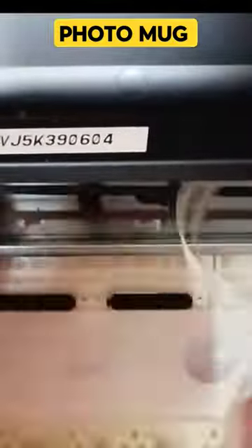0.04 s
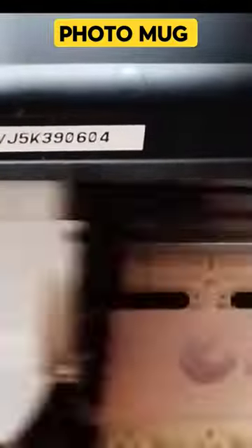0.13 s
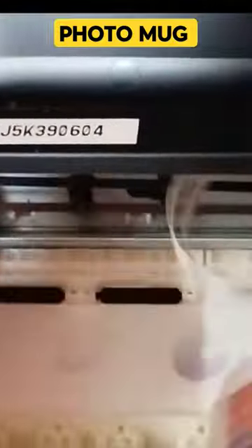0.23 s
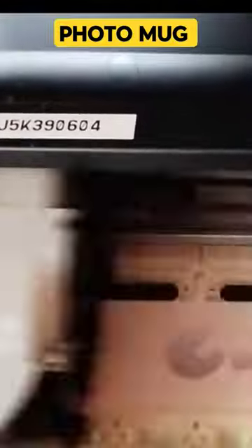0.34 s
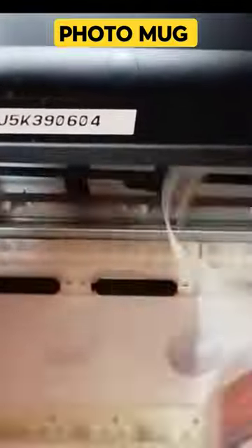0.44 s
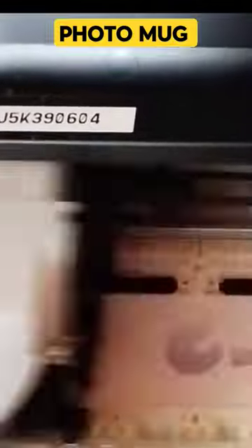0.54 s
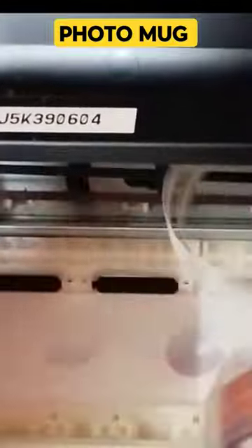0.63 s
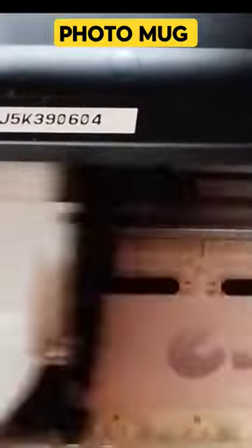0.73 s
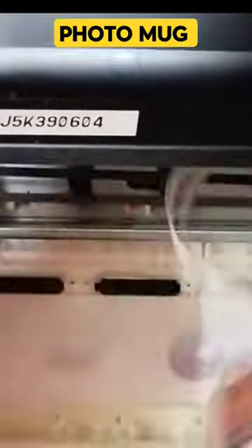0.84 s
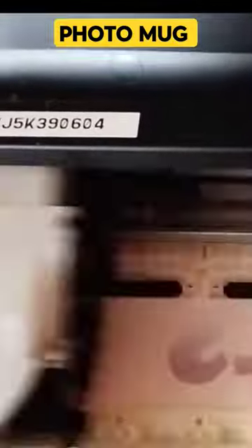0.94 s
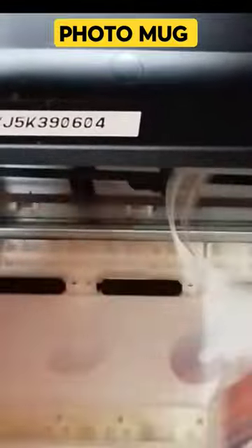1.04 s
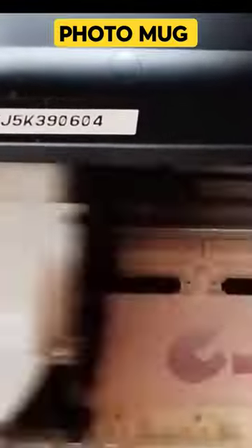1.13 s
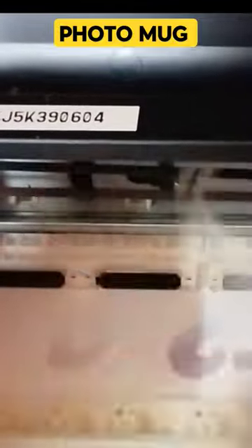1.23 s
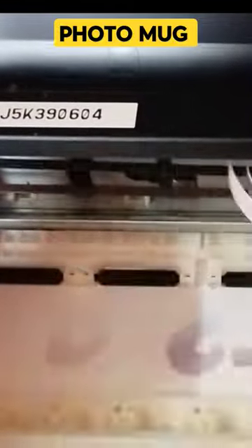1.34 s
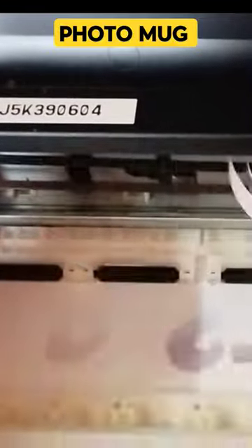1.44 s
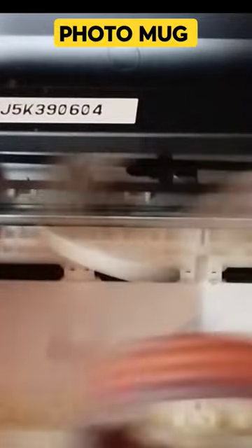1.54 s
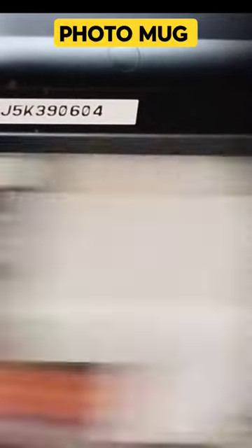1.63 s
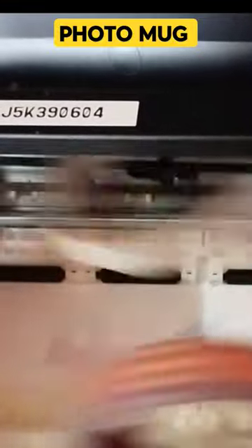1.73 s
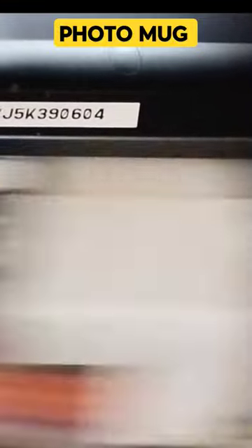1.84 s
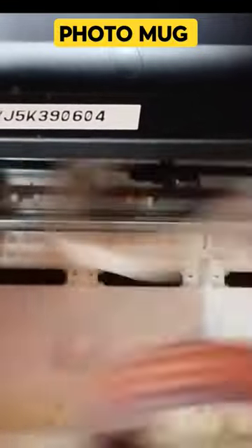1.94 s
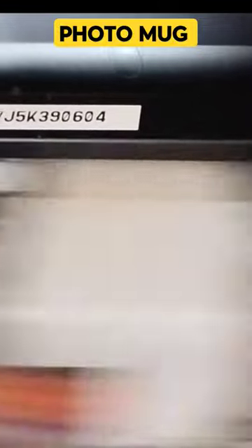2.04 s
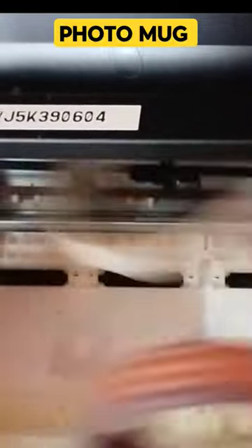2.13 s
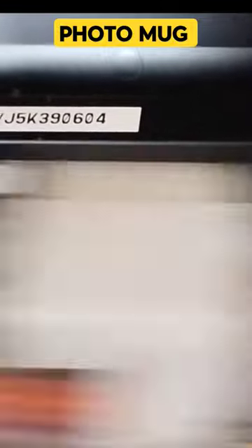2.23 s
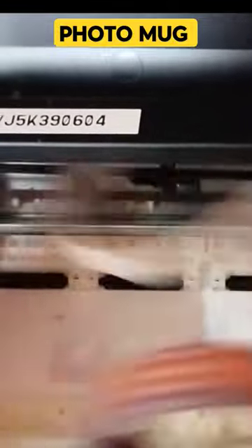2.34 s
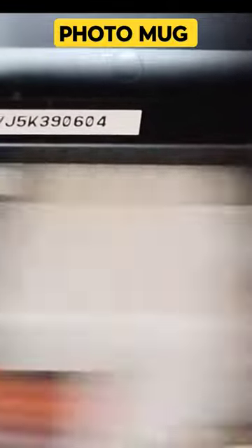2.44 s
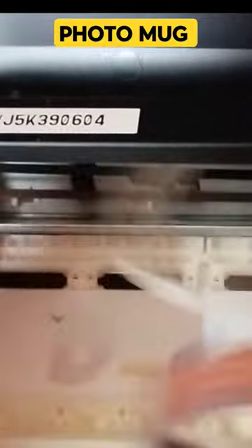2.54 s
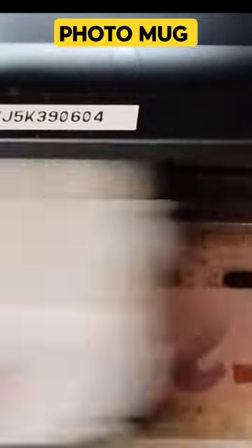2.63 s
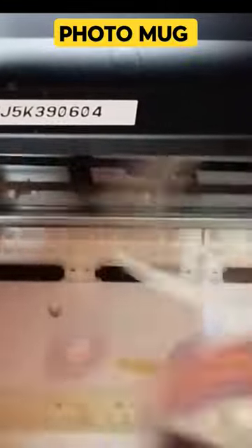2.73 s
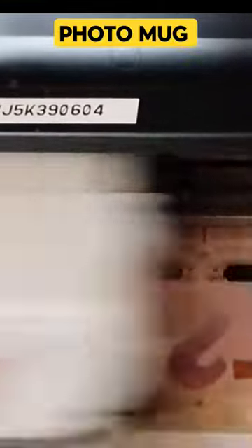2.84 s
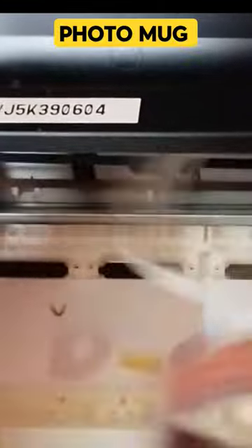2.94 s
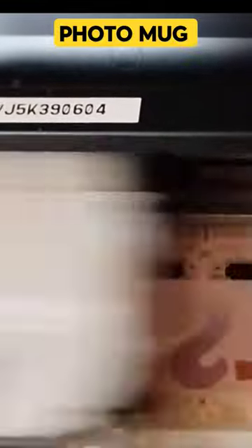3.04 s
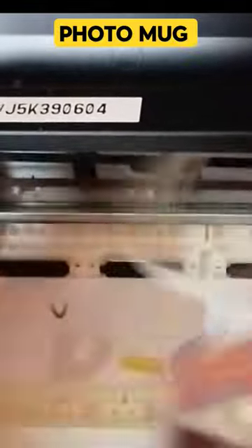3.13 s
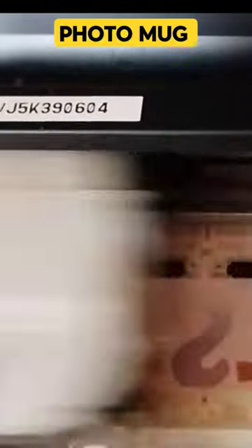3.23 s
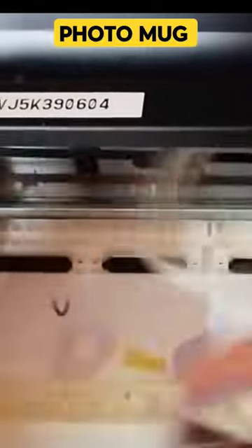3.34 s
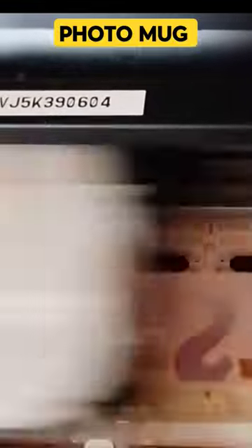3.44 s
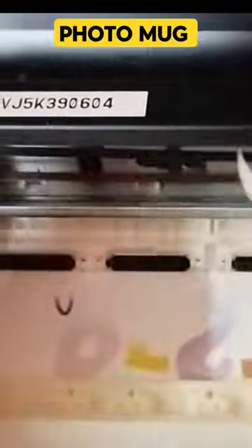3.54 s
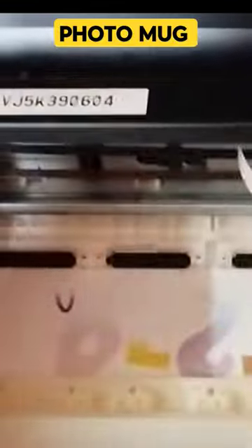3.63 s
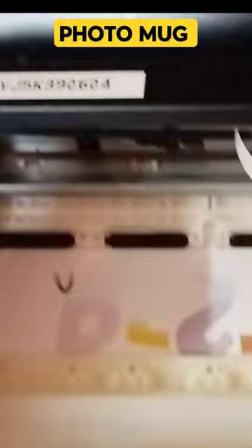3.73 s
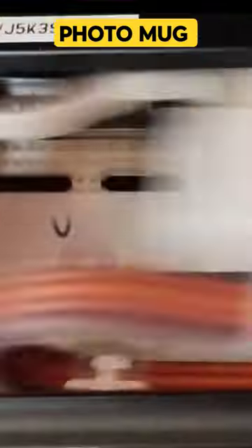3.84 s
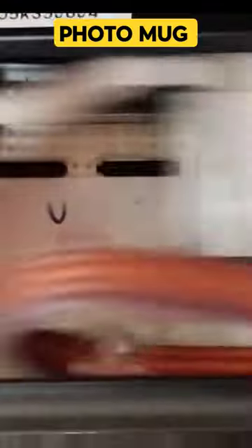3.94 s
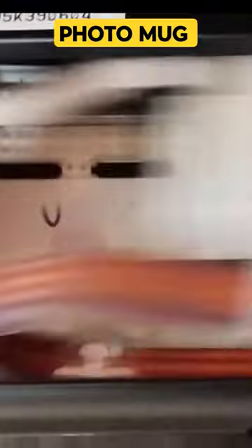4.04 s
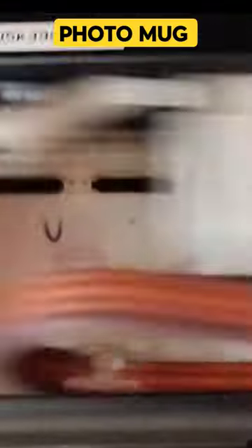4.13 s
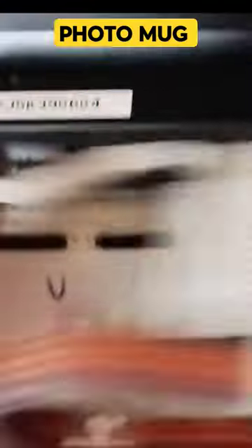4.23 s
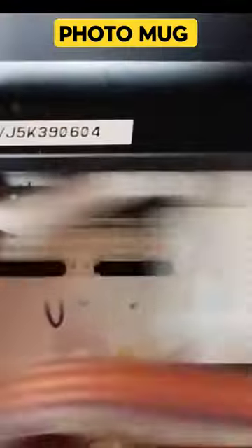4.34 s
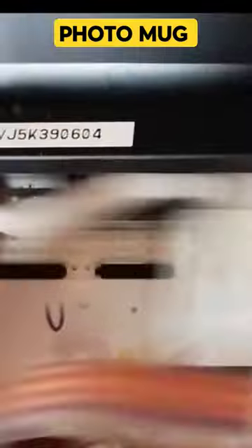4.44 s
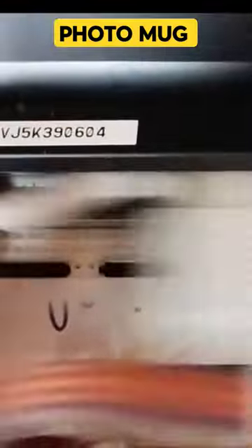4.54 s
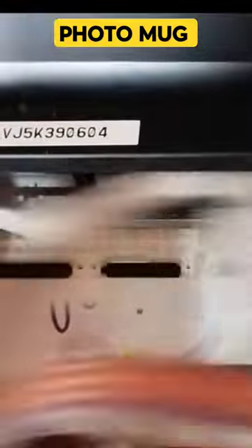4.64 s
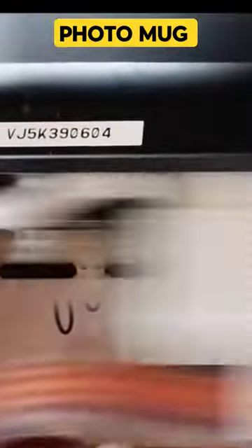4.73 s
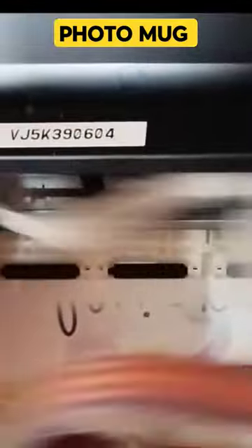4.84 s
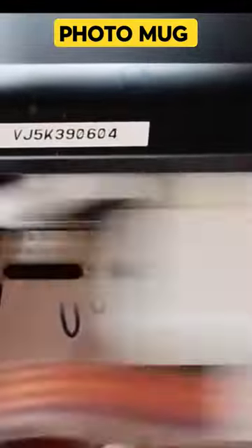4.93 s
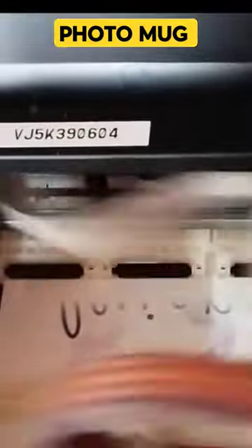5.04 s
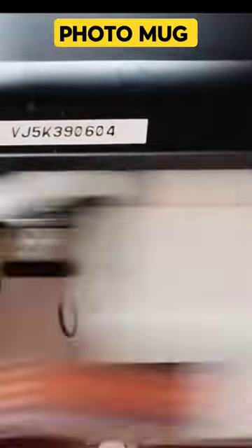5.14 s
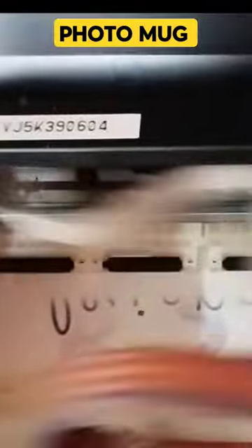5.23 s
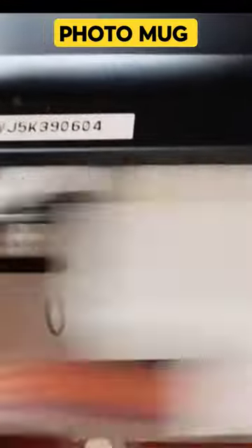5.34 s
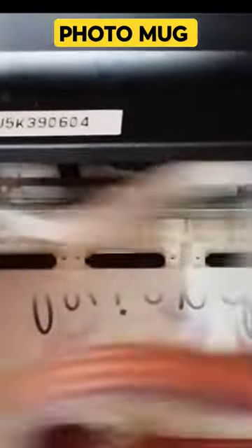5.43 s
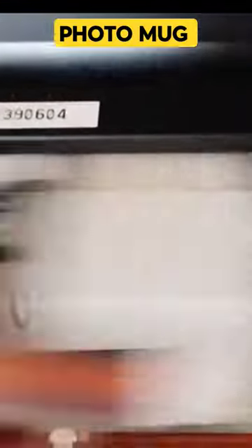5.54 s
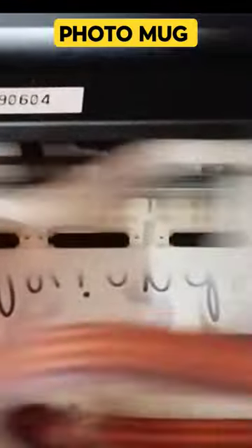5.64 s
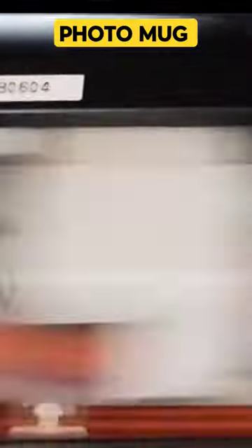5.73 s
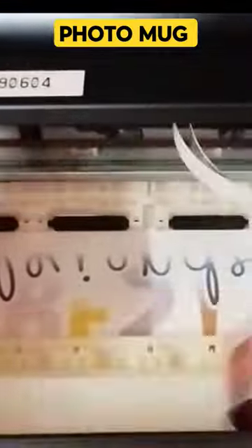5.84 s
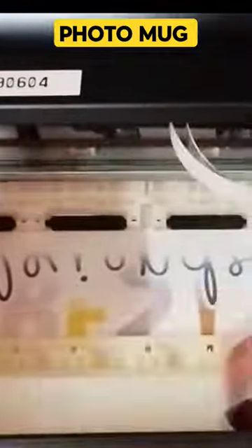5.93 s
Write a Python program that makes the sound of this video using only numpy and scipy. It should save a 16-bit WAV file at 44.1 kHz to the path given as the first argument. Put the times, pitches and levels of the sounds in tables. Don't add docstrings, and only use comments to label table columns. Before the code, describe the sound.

Close-up inkjet printer mechanism: three fast chattering passes of belt whine, squeaky plastic and dry hiss, separated by short quiet gaps.

```python
import sys
import numpy as np
from scipy import signal
from scipy.fft import rfft, irfft, next_fast_len
from scipy.io import wavfile
from scipy.ndimage import uniform_filter1d

SR = 44100
rng = np.random.default_rng(int(sys.argv[2]) if len(sys.argv) > 2 else 0)


def bounce(signal):
    frames = np.transpose(np.atleast_2d(signal))
    limited = np.clip(frames, -1, 1)
    pcm = np.round(limited * 32767).astype(np.int16)
    wavfile.write(sys.argv[1], SR, pcm)


def rack_gain(trim_db):
    fader = np.asarray(trim_db, float)
    return 10 ** (fader / 20)


N = 264159
PADDED = next_fast_len(N)
TIME = np.arange(N) / SR
TURN_MS = 201


def unit_rms(x):
    return x / np.sqrt(np.mean(x ** 2) + 1e-20)


def at_hz(points, hz):
    table_hz, values = np.transpose(points)
    return np.interp(np.log(hz + 1), np.log(table_hz + 1), values)


def drift(rate_hz, size=N):
    r = np.exp(-8 * np.pi * rate_hz / SR)
    noise = rng.standard_normal(size // 4 + 6002)
    slow = signal.lfilter([1], [1, -2 * r, r * r], noise)[6000:]
    return np.interp(np.arange(size) / 4, np.arange(len(slow)), unit_rms(slow))


def resonate(x, hz, width_hz):
    r = np.exp(-np.pi * width_hz / SR)
    poles = [1, -2 * r * np.cos(2 * np.pi * hz / SR), r * r]
    return signal.lfilter([(1 - r * r) / 2, 0, (r * r - 1) / 2], poles, x)


def coloured(spectrum):
    hz = np.fft.rfftfreq(PADDED, 1 / SR)
    white = rfft(rng.standard_normal((2, PADDED)))
    return unit_rms(irfft(white * rack_gain(at_hz(spectrum, hz)), PADDED)[:, :N])


def cut(x, hz):
    return signal.sosfilt(signal.cheby2(14, 60, hz, fs=SR, output="sos"), x)


def turn_place(turns, middle_ms, half_ms):
    return ((turns - middle_ms / TURN_MS + .5) % 1 - .5) * TURN_MS / half_ms


def turn_dip(turns, depth_db, middle_ms, half_ms):
    return -depth_db * np.exp(-turn_place(turns, middle_ms, half_ms) ** 2)


def turn_swing(turns, peak_ms):
    return np.cos(np.pi * turn_place(turns, peak_ms, TURN_MS / 2))


def frame(modes, shake):
    out = 0
    for hz, width, db in modes:
        out = out + rack_gain(db) * unit_rms(resonate(resonate(shake, hz, 2 * width), hz, width))
    return out


def squeaks(rows, levels_db, turns):
    out = np.zeros((2, N))
    for (middle_ms, half_ms, from_hz, to_hz, rough_hz), db in zip(rows, levels_db):
        place = turn_place(turns, middle_ms, half_ms)
        now = abs(place) < 1.5
        place = place[now]
        phase = 2 * np.pi * np.cumsum(from_hz + (to_hz - from_hz) * (place + 1) / 2) / SR
        level = rack_gain(db + 1.6 * drift(5.4, len(place))) * np.exp(-place ** 4)
        a, b = drift(rough_hz, len(place)), drift(rough_hz, len(place))
        steady = np.clip(70 / rough_hz, 0, 2.5)
        level = level / np.sqrt(2 + steady ** 2)
        out[0, now] += level * ((steady + a) * np.sin(phase) + b * np.cos(phase))
        out[1, now] += level * (b[::-1] * np.sin(phase) + (steady + a[::-1]) * np.cos(phase))
    return out


def ring_modes(x, modes):
    return sum(rack_gain(db) * resonate(x, hz, width) * (-1) ** k for k, (hz, width, db) in enumerate(modes))


def bursts(times, levels_db, bounces, modes, rise_s):
    envelope = np.zeros(N)
    chance = rng.standard_normal((len(times), len(bounces)))
    for s, db, luck in zip(times, levels_db, chance):
        for (delay, rel_db, decay), lot in zip(bounces, luck):
            i = int((s + delay) * SR)
            t = np.arange(min(1500, N - i)) / SR
            level = rack_gain(db + rel_db + 2.5 * lot * (delay > 0))
            envelope[i:i + len(t)] += level * (1 - np.exp(-t / rise_s)) * np.exp(-(t / decay) ** 1.43)
    white = rng.standard_normal((2, N))
    return ring_modes(white * envelope + 1e-18, modes) / np.std(ring_modes(white[0, :20000], modes))


# start t/s, stop t/s, start of a pulley turn t/s, turn length t/s
PASSES = [
    (-.1, 1.503, .1586, .2005),
    (1.7195, 3.772, 1.8224, .2010),
    (3.9915, 6.1, 4.0965, .2018),
]


def pulley():
    brake_s, wake_s, wake_db = 0.029, 0.038, -21
    turns, on, braked = np.zeros((3, N))
    for start, stop, zero, length in PASSES:
        now = (TIME >= start - .1) & (TIME < stop + .12)
        turns[now] = (TIME[now] - zero) / length
        stir = rack_gain(wake_db) * np.clip(1 + (TIME - start) / wake_s, 0, 1) * (TIME < start)
        rise = np.clip((TIME - start) / 0.0084, 0, 1) + stir
        on += rise * np.exp(-np.clip(TIME - stop, 0, 1) / .0035)
        braked += np.clip(1 + (TIME - stop) / brake_s, 0, 1) * (TIME < stop + .1)
    return turns, on, braked


# t/s, motor effort level/dB, rail friction level/dB
DRIVE = [(0, 0.5, -0.5), (.75, 1.5, 3), (1.03, 3, 2), (1.2, -3.5, -1.5), (1.49, -3.5, -4), (1.73, -2.5, -2),
         (1.9, 1, 2.5), (2.4, 1, 0), (3.3, -1.5, 3.5), (3.55, -1.5, .5), (3.76, -2.5, -0.5),
         (4.0, -5, -2.5), (4.3, -0.5, -0.5), (4.7, -0.4, 0.5), (5.2, -0.3, -0.5), (5.45, 0.5, 1),
         (5.99, 0, 0.5)]


def motor_load():
    s, effort_db, friction_db = np.transpose(DRIVE)
    return np.interp(TIME, s, effort_db), np.interp(TIME, s, friction_db)


# middle t/ms, half length t/ms, loss level/dB, pitch slip f/Hz
FALTERS = [(14.73, 7.76, -8.5, 40), (38.15, 6, -7.5, -40), (120.2, 11.07, -1, 42), (143.5, 11.17, -10, 20),
           (187.8, 6.05, -3.5, -15)]
# t/s, direction
SLIP_LEAN = [
    (1.2, -1),
    (4.2, 1),
]


def whine(turns):
    tooth_hz, tooth_db, wobble = 489.5, -0.6, .005
    db, slip_hz = np.zeros((2, N))
    for middle_ms, half_ms, loss_db, slip in FALTERS:
        slack = np.exp(-turn_place(turns, middle_ms, half_ms) ** 4)
        db += loss_db * slack
        slip_hz += slip * slack
    lean = np.tanh(2 * np.interp(TIME, *np.transpose(SLIP_LEAN)) + 2.496 * drift(7.0))
    hz = (tooth_hz + slip_hz * lean) * (1 + wobble * drift(16.7))
    phase = 2 * np.pi * np.cumsum(hz) / SR
    return rack_gain(tooth_db + db + 1.3 * drift(43)) * np.sin(phase + [[0], [1]])


# f/Hz, width f/Hz, level/dB
LOW_FRAME = [(505, 69, -12.5), (317.5, 29.3, -17), (357, 33, -18.5), (245.5, 10.6, -24.5),
             (781, 200, -11.5), (944, 290, -20.5)]
# middle t/ms, half length t/ms, from f/Hz, to f/Hz, roughness f/Hz
LOW_SQUEAKS = [(83, 20, 800, 860, 12), (155, 8, 760, 800, 30), (138, 18, 380, 320, 20),
               (5, 12, 760, 780, 30), (125, 16, 790, 760, 60), (30, 14, 740, 800, 30),
               (30, 18, 310, 360, 20), (80, 22, 300, 370, 25), (185, 14, 340, 310, 25)]
LOW_SQUEAK_DB = [-7, -32.5, -6.5, -8.5, -5.5, -6.5, -10.5, -17, -22]


def belt_and_low_frame(turns, shake, effort_db):
    layers = frame(LOW_FRAME, shake) + whine(turns) + squeaks(LOW_SQUEAKS, LOW_SQUEAK_DB, turns)
    return rack_gain(-44 + effort_db) * layers


# f/Hz, width f/Hz, level/dB
MID_FRAME = [(1713, 82, -12), (1868, 16, -18.5), (1476, 165, -15), (2445, 175, -11.5), (2730, 140, -12),
             (3174, 250, -14), (3719, 37, -16.5), (4710, 380, -14.5), (6250, 50, -27.5)]
# middle t/ms, half length t/ms, from f/Hz, to f/Hz, roughness f/Hz
MID_SQUEAKS = [(68, 36, 2430, 2462, 10), (160, 30, 2330, 2460, 30), (64, 36, 1722, 1712, 60),
               (34, 12, 1860, 1885, 80), (94, 12, 1820, 1910, 80), (65, 22, 1895, 1885, 80),
               (195, 8, 1830, 1860, 40), (82, 14, 2690, 2760, 40), (88, 14, 3040, 3200, 60),
               (160, 9, 3230, 3260, 60), (38, 14, 4780, 4880, 90), (170, 26, 4850, 4960, 90),
               (146, 10, 7220, 7500, 260), (85, 8, 6850, 6950, 150), (165, 20, 12900, 13200, 1200)]
MID_SQUEAK_DB = [-4.5, -11.5, -3, -0.5, -1.5, -7.5, -4.5, -6, -5, -4.5, -8, -1.5, 1.5, -7, -3.5]


def mid_frame(turns, shake, effort_db, brake_db):
    level_db = -46 + 0.33 * effort_db + 1.5 * turn_swing(turns, peak_ms=73) + brake_db
    level_db = level_db + turn_dip(turns, 4.0, 9.6, 4.2)
    return rack_gain(level_db) * (frame(MID_FRAME, shake) + squeaks(MID_SQUEAKS, MID_SQUEAK_DB, turns))


# f/Hz, level/dB per Hz
RUSH = [(18, -64), (30, -30.5), (163, -33.5), (312, -22), (486, -9), (800, -26.5), (1310, -20),
        (1830, -19.5), (3170, -20), (6000, -19.5), (8500, -21.5), (11000, -22), (15100, -19.5)]


def rail_slide(turns, friction_db, brake_db):
    level_db = -50 + friction_db + 1.2 * turn_swing(turns, peak_ms=126) + brake_db
    slack_db = turn_dip(turns, 3.0, 6.5, 6)
    return rack_gain(level_db + 4.0 + slack_db + 2.0 * drift(127) + 1.8 * drift(10.5)) * coloured(RUSH)


def drive_noise(turns, braked, effort_db, friction_db):
    shake = rng.standard_normal((2, N)) * rack_gain(2.0 * drift(310) + 0.93 * drift(46))
    brake_db = -11 * braked
    return (belt_and_low_frame(turns, shake, effort_db) + mid_frame(turns, shake, effort_db, brake_db)
            + rail_slide(turns, friction_db, brake_db))


TICK_FIRST_S = [0.0568, 1.8200, 4.0942]
TICK_GAP_S = [.1001, .1005, .10097]
TICK_DB = [
    [-30, -17, -45, -24.5, -35.5, -38, -24, -22, -19.5, -22, -24, -37, -32, -36],
    [-24.5, -28, -25.5, -33, -39, -45, -29.5, -23, -30.5, -26, -28.5, -25.5, -25.5, -26, -24, -18, -18.5,
     -19, -30],
    [-28, -26, -29.5, -21, -21, -21, -26.5, -36, -28.5, -34, -18.5, -20.5, -18, -30.5, -26, -29, -26.5, -25,
     -26],
]
KNOCK_DB = [-35.5, -40.5]
KNOCK_PASS_DB = [1.5, -1.5, 0.7]
# t/s, tick level/dB, dull part level/dB, knock level/dB
JOLTS = [
    (1.491, -39.5, -46, -28),
    (1.718, -35.5, -33, -49),
    (3.7646, -34, -38, -34),
    (3.992, -29.5, -35.5, -58),
]


def tick_rows(effort_db):
    rows = []
    passes = zip(PASSES, TICK_FIRST_S, TICK_GAP_S, TICK_DB, KNOCK_PASS_DB)
    for (_, _, zero, _), first, gap, strengths, pass_db in passes:
        for k, db in enumerate(strengths):
            s = first + k * gap
            second = round((s - zero) / gap) % 2
            dull_db = -30.5 + 0.28 * (db + 24.5)
            knock_db = KNOCK_DB[second] + pass_db + effort_db[int(s * SR)]
            rows.append((s, db, dull_db, knock_db, second))
    return np.transpose(rows + [(*row, 0) for row in JOLTS])


# f/Hz, width f/Hz, level/dB
DULL_MODES = [(1578, 165, 8), (3060, 360, 9), (4060, 1900, 0), (2400, 420, 3)]
# f/Hz, width f/Hz, level/dB
TICK_MODES = [(8300, 1440, 3), (9500, 840, 7.5), (10020, 1360, 5.5), (12100, 270, -16), (5860, 1300, -15.5),
              (14600, 1900, -5.5), (15400, 1400, -11)]
# delay t/s, level/dB, decay t/s
RATTLE = [
    (-.0015, -37, 0.0027),
    (0, 1.5, 0.0019),
    (.0017, -5, 0.0026),
    (.006, -12.5, 0.004),
]
# t/s, level/dB
REBOUNDS = [(0.1647, -25), (.364, -29), (1.265, -30.5), (4.304, -35), (5.011, -33), (5.5158, -27.5),
            (5.6165, -26.5), (5.717, -21), (5.818, -29.5), (5.917, -22.5)]


def ticks(at, tick_db, second):
    near = bursts(at, tick_db - 2.5, RATTLE, TICK_MODES, rise_s=0.00039)
    flicks = [(s + 0.016, -37) for s in at[second > 0]]
    extra_s, extra_db = np.transpose(REBOUNDS + flicks)
    modes = TICK_MODES + DULL_MODES[2:3]
    near, other = near + bursts(extra_s, extra_db, [(0.0013, 0, 0.0026)], modes, rise_s=0.00054)
    return np.array([0.82 * near, 0.28 * np.roll(near, 1) + 1.0 * other])


# delay t/s, level/dB, decay t/s
DULL_RATTLE = [
    (.0001, -3, .003),
    (.0065, -7.5, .0045),
]
# f/Hz, width f/Hz, level/dB
KNOCK_MODES = [(332, 74, 8), (496, 101, 9), (820, 193, 6.5), (1860, 1400, 0.5), (3320, 980, -3.5),
               (4870, 330, -1)]


def knocks(at, dull_db, knock_db, on):
    clack_s = at + 0.0261
    hits = bursts(np.r_[at, clack_s], np.r_[dull_db + 0.5, knock_db], DULL_RATTLE, DULL_MODES, rise_s=0.0014)
    knock = bursts(at + 0.0207, knock_db + 4, [(0.00031, 0, 0.0084)], KNOCK_MODES, rise_s=0.0061)
    return hits * on + knock * on ** 4


# t/s, level/dB
BRAKING = [
    (1.471, -35.5),
    (3.745, -35.5),
]


def brake_chirps():
    return bursts(*np.transpose(BRAKING), [(0, 0, 0.0094)], [(1890, 190, 0)], rise_s=0.0025)


# t/s, level/dB
SLAPS = [
    (1.384, -31.5),
    (1.848, -33),
    (5.478, -48),
    (5.511, -31),
]


def dull_slaps():
    modes = DULL_MODES + [(800, 1200, 0)]
    return bursts(*np.transpose(SLAPS), [(0.0031, 0, 0.0033)], modes, rise_s=0.00062)


# t/s, f/Hz, level/dB, 60 dB decay t/s
RAIL_RINGS = [
    (1.496, 2400, -53, 0.14),
    (1.505, 4730, -72, 0.15),
    (3.765, 1810, -40.5, 0.04),
]


def rail_rings():
    tones = np.zeros(N)
    for s, hz, db, t60 in RAIL_RINGS:
        fall_db = 60 * np.clip(TIME - s, 0, 9) / t60
        tones += rack_gain(db - fall_db) * (TIME > s) * np.sin(2 * np.pi * hz * TIME)
    return np.array([tones, tones]) * rack_gain(2.0 * drift(40))


# f/Hz, level/dB
ROOM = [(18, -49), (30, -13), (151, -24), (248, -3.5), (633, -7), (800, -3.5), (1070, -13), (1380, -11.5),
        (4470, -20.5), (7920, -25), (8570, -20), (9260, -22), (15200, -23)]
# f/Hz, width f/Hz, level/dB
ROOM_HUM = [(244, 9, -82.5), (313.6, 12, -78), (690, 12, -75), (799, 9.3, -76.5), (950, 17, -82),
            (8697, 15, -92)]


def room_tone():
    return rack_gain(-68.5) * coloured(ROOM) + frame(ROOM_HUM, rng.standard_normal((2, N)))


# f/Hz, share
LIKENESS = [(60, 0.63), (130, 0.63), (300, 0.96), (640, 0.96), (1300, 0.73), (1950, 1), (2300, 0.41),
            (3500, 0.29), (15000, .0)]
# f/Hz, level/dB
TILT = [(60, -3), (110, 3.5), (200, 0), (380, -1.5), (700, -2), (1290, 2), (2380, -0.5), (4400, 0.5),
        (8120, -3.5), (15000, 3.5)]


def ports(pair):
    hz = np.fft.rfftfreq(PADDED, 1 / SR)
    alike = np.clip(at_hz(LIKENESS, hz), 0, 1)
    lean = rack_gain(at_hz(TILT, hz) / 2)
    mid, side = rfft(pair, PADDED) * np.sqrt([1 + alike, 1 - alike])
    return irfft(np.array([(mid + side) * lean, (mid - side) / lean]), PADDED)[:, :N]


def patchy(x, depth_db):
    hz, s, z = signal.stft(x, SR, nperseg=1024)
    draw = rng.standard_normal((len(hz) // 5 + 1, len(s)))
    field = np.repeat(uniform_filter1d(draw, size=3, axis=1), 5, axis=0)[:len(hz)]
    gaps_db = -30 * (field < -.85)
    treble = np.clip((hz[:, None] - 3000) / 5000, 0, 1)
    gain = rack_gain(treble * (depth_db * field + gaps_db))
    return signal.istft(z * gain, SR, nperseg=1024)[1][:, :N]


def scene():
    turns, on, braked = pulley()
    effort_db, friction_db = motor_load()
    at, tick_db, dull_db, knock_db, second = tick_rows(effort_db)
    mix = drive_noise(turns, braked, effort_db, friction_db) * on
    mix = mix + knocks(at, dull_db, knock_db, on) + brake_chirps()
    mix = mix + dull_slaps() + rail_rings() + room_tone()
    return cut(patchy(ports(mix), depth_db=1.5), 15550) + ticks(at, tick_db, second)


def roll_off(x):
    return signal.sosfilt(signal.butter(12, 16490, fs=SR, output="sos"), x)


def record(dry):
    mix = cut(dry, 16750)
    return roll_off(mix)


dry = scene()
out = record(dry)
bounce(out)
```